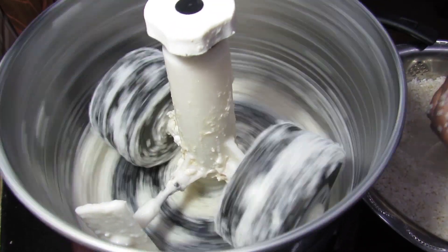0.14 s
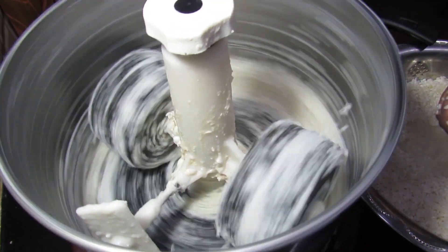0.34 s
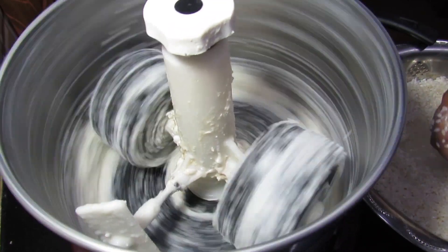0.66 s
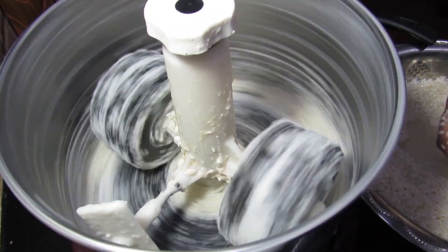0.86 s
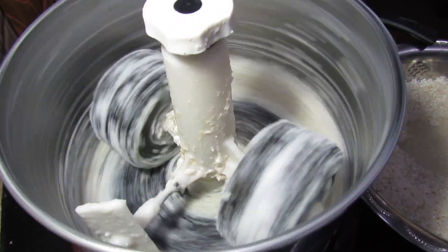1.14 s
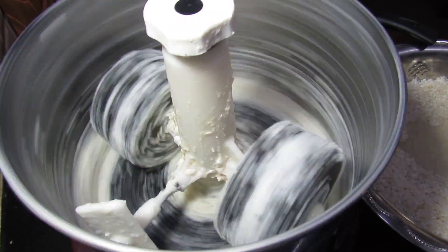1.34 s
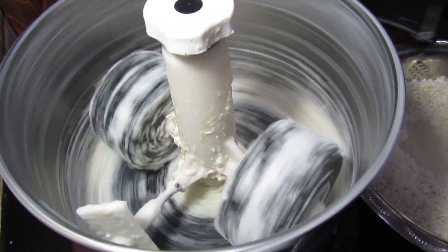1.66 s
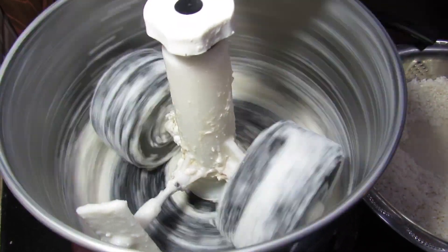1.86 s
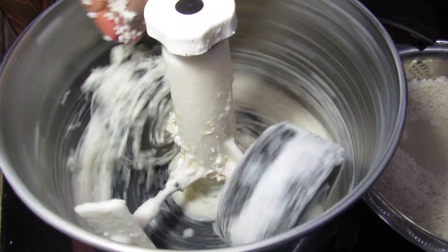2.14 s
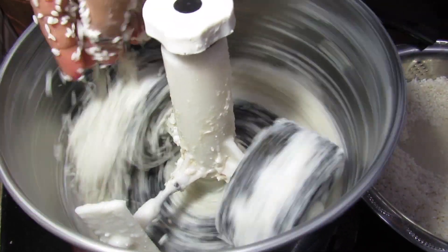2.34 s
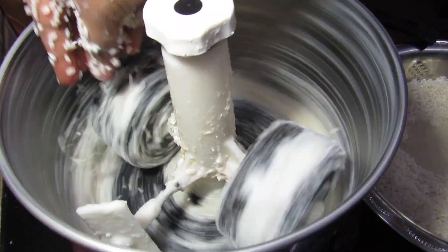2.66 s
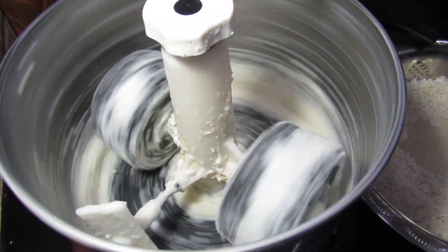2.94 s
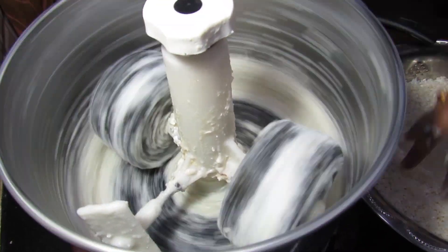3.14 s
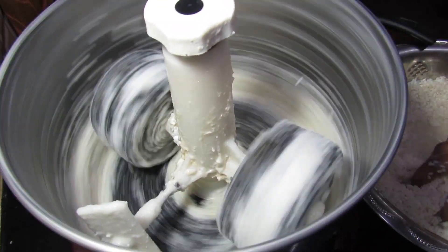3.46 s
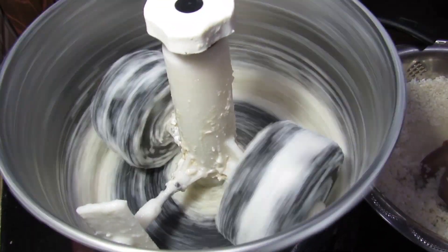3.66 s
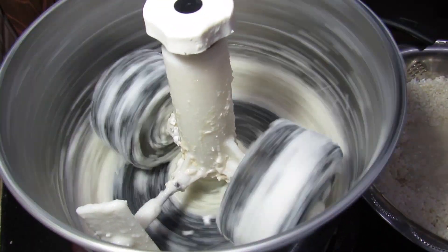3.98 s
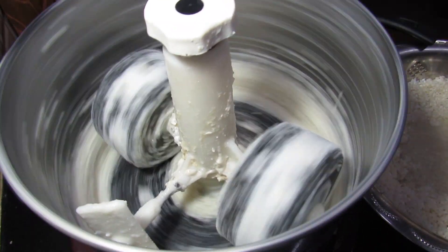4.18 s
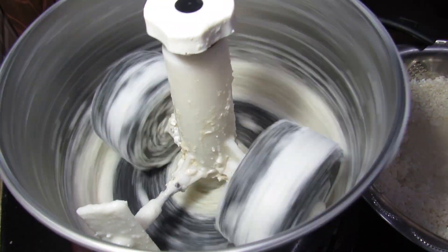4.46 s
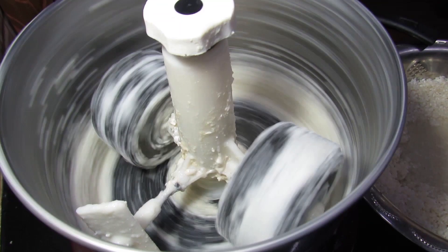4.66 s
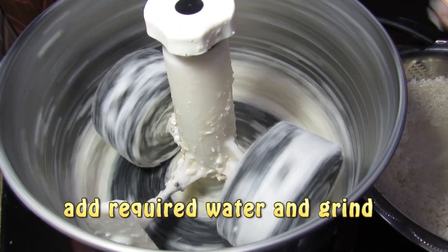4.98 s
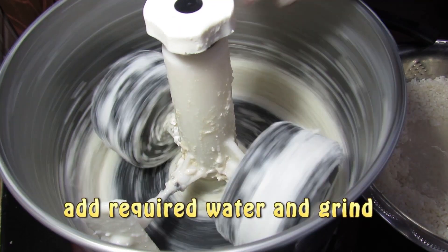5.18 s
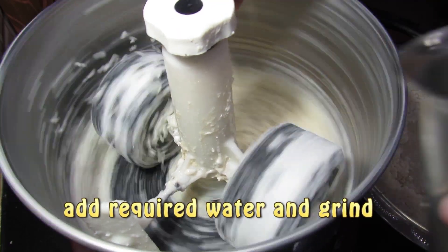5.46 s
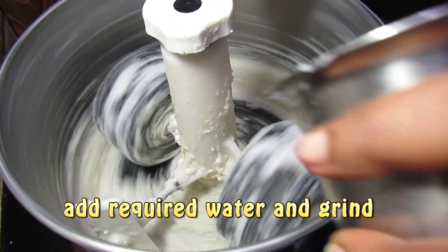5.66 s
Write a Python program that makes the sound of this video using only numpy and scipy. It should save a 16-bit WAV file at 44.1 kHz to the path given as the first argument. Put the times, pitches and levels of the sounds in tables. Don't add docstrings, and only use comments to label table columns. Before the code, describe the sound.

Close, steady motor hum with thudding stone rollers, snapping grains and wet hiss; rice showers in, and near the end a metal cup briefly squeaks.

```python
import sys
import numpy as np
from scipy import signal
from scipy.fft import rfft, irfft, next_fast_len
from scipy.io import wavfile
from scipy.ndimage import uniform_filter1d, map_coordinates

SR = 44100
rng = np.random.default_rng(int(sys.argv[2]) if len(sys.argv) > 2 else 0)


def int16_out(signal):
    q = np.round(np.clip(np.atleast_2d(signal).T, -1, 1) * 32767)
    wavfile.write(sys.argv[1], SR, q.astype(np.int16))


def attenuation_scalar(level_db):
    decades = np.asarray(level_db, float) / 20
    return 10 ** decades


N = 256750

# (f/Hz, width/Hz, level/dB)
STONE = [(571, 60, -1), (782.6, 24, 1), (878, 42, 5), (1000, 62, -2.5), (1138, 130, -5), (1380, 87, 0),
         (1574, 84, -6), (1734, 81, -2.5), (2107, 420, -8.5), (2800, 600, -18)]
TOUCH_S, DAMP_S = 5.55, 0.089
DAMPED_DB = -9.5


def unit(x):
    return x / np.sqrt(np.mean(x ** 2) + 1e-20)


def evened(x, share):
    power = np.abs(uniform_filter1d(x ** 2, size=SR // 14)) + 1e-12
    return unit(x / power ** (share / 2))


def along(points, hz):
    f, v = np.transpose(points)
    return np.interp(np.log(hz + 1), np.log(f + 1), v)


def curves(rows):
    s, *cols = np.transpose(rows)
    return [np.interp(np.arange(N) / SR, s, c) for c in cols]


def wobble(rate):
    knots = rng.standard_normal(int(N * rate / SR) + 4)
    return map_coordinates(knots, [np.arange(N) * rate / SR])


def settle(s, long_s):
    return (1 + np.tanh(2 * (np.arange(N) / SR - s) / long_s)) / 2


def drum_swing(count):
    turn_hz, high_spot_s = 2.5, 0.07
    return np.cos(2 * np.pi * count * turn_hz * (np.arange(N) / SR - high_spot_s))


def struck(t, rise_s, t60):
    return attenuation_scalar(-60 * t / t60) * (1 - np.exp(-t / rise_s))


def filtered(x, response):
    m = next_fast_len(N + SR // 2)
    return irfft(rfft(x, m) * response(np.fft.rfftfreq(m, 1 / SR)), m)[..., :N]


def modes(table):
    def response(f):
        return sum((-1) ** k * attenuation_scalar(db) * 1j * f * w / (c * c - f * f + 1j * f * w)
                   for k, (c, w, db) in enumerate(table))
    return response


def pasted(table, hz):
    return lambda f: modes(table)(f) / (1 + (f / hz) ** 6)


def bumps(rate, spread_db, smooth_db, life):
    size = attenuation_scalar(spread_db * np.minimum(rng.exponential(size=N), 2.5))
    hits = (rng.random(N) < rate / SR) * size
    pressure = signal.lfilter([1], [1, -np.exp(-1 / (life * SR))], hits)
    return unit(pressure * rng.standard_normal(N)) + attenuation_scalar(smooth_db) * rng.standard_normal(N)


def motor():
    # (multiple of the hum, level/dB)
    overtones = [(2, -5), (3, -5), (4, -1), (6, -21)]
    hum_db = -27.5 + DAMPED_DB * settle(TOUCH_S, DAMP_S)
    shifted = settle(3.55, .2)
    shaft_db = -37.5 - 12.5 * shifted
    stand_db = -41.5 + 4.5 * shifted
    turn = 2 * np.pi * np.cumsum(100.13 + .15 * wobble(4.013)) / SR
    hum = np.sin(turn) * attenuation_scalar(0.24 * wobble(6.6))
    for k, db in overtones:
        hum += attenuation_scalar(db + 2.1 * wobble(7.6)) * np.sin(k * turn + .5 * wobble(4.6))
    shaft = attenuation_scalar(shaft_db) * np.sin(.488 * turn)
    stand = filtered(rng.standard_normal(N), lambda f: modes([(69, 12, 0)])(f) ** 2)
    stand = attenuation_scalar(stand_db + 1.2 * drum_swing(count=1)) * unit(stand)
    return np.sqrt(2) * (attenuation_scalar(hum_db) * hum + shaft) + stand


def room_tone():
    # (f/Hz, level/dB per Hz)
    spectrum = [(15, -55), (25, -51), (82, -16), (136, -12.5), (200, -4.5), (262, -25.5), (403, -17.5),
                (667, -34.5), (876, -29), (2600, -49), (3380, -66), (5720, -120)]
    noise = filtered(rng.standard_normal(N), lambda f: attenuation_scalar(along(spectrum, f)))
    return attenuation_scalar(-28.0 + DAMPED_DB * settle(TOUCH_S, DAMP_S)) * unit(noise)


def rolling():
    # (f/Hz, width/Hz, level/dB)
    bottom = [(168.1, 13.6, -4.5), (199, 11.9, 1.5), (231, 10.2, -6.5)]
    # (f/Hz, width/Hz, level/dB)
    bowl = [(248.3, 30.5, -7), (316.6, 34.6, -2.5), (353, 36.8, -1), (391.6, 25.8, -1.5), (423.6, 23, -6),
            (475, 36.5, -11)]
    # (t/s, level/dB on the drum bottom)
    loads = [(.04, 2), (.29, -3), (.6, 2.5), (1.04, -10), (1.21, 4), (1.53, -2), (1.74, -9), (1.95, 2),
             (2.05, 3), (2.21, 11), (2.3, 2), (2.46, 10.5), (2.63, -10), (2.88, 8.5), (2.96, -5),
             (3.22, 1.5), (3.42, 1.5), (3.56, 5), (3.69, 1), (3.78, -6), (4.03, 8), (4.29, 8.5),
             (4.47, 8.5), (4.73, -18), (4.78, 7), (4.92, 5.5), (4.99, -6), (5.3, 5.5), (5.49, 5),
             (5.59, -6)]
    t = np.arange(N) / SR
    swell_s = 0.018
    load_db = sum(db * np.exp(-((t - s) / swell_s) ** 2 / 2) for s, db in loads)
    boom_db = -22.5 + 2 * drum_swing(count=1) + drum_swing(count=2) + load_db
    boom_db = boom_db - 2.5 * settle(TOUCH_S, DAMP_S)
    roll_db = -22 + 0.25 * drum_swing(count=1) + 0.42 * wobble(25)

    def deep(f):
        return (1j * f / 150) ** 2 / (1 + 1.1j * f / 150 - (f / 150) ** 2)

    tread = filtered(bumps(200, 0.38, 0.29, life=0.0016), lambda f: deep(f) ** 2)
    boom = attenuation_scalar(boom_db) * evened(filtered(tread, pasted(bottom, 246)), share=1.0)
    roll = attenuation_scalar(roll_db) * evened(filtered(tread, pasted(bowl, 533)), share=0.49)
    return boom + roll


def grinding():
    # (t/s, level/dB over thin batter)
    feed = [(0, 0.5), (1.2, 0.1), (1.9, 2.5), (2.3, 7), (2.6, 8), (3.05, 3.5), (3.4, 5), (3.65, 2),
            (4.3, 4), (5.2, 4), (5.82, 6)]
    # (f/Hz, level/dB per Hz)
    hiss_spectrum = [(1350, -30), (2300, -20), (3120, 0), (3970, -5.5), (4650, -3), (5690, -7),
                     (6410, -6.5), (6890, -8.5), (7830, -4.5), (8560, -6.5), (9190, -6.5), (11500, -7.5),
                     (14200, -11.5), (15600, -17)]
    # (f/Hz, width/Hz, level/dB)
    steel_wall = [(4990, 420, -5), (6500, 540, -5), (9450, 480, -3.5), (11000, 600, -2.5)]
    feed_db, = curves(feed)
    surge = wobble(18)
    grind_db = -36 + .4 * feed_db + 1.02 * surge
    hiss_db = -44.7 + feed_db + 0.97 * surge + 0.71 * wobble(35)
    crush = bumps(160, 0.97, 3.0, life=0.0024)
    grind = attenuation_scalar(grind_db) * unit(filtered(crush, pasted(STONE, 4200)))
    spray = attenuation_scalar(-13.5) * crush + bumps(400, 3.5, 4.4, life=0.00055)

    def colour(f):
        return attenuation_scalar(along(hiss_spectrum, f)) * (1 + np.abs(modes(steel_wall)(f)))

    return grind + attenuation_scalar(hiss_db) * unit(filtered(spray, colour))


def cracks():
    # (t/s, peak level/dB, edge level/dB)
    near_grains = [(0.027, -13, -16.5), (.148, -15.5, -14), (.432, -14.5, -17), (.596, -15, -18),
                   (1.155, -15, -32), (1.604, -14.5, -18), (1.696, -17, -21), (1.805, -16, -24),
                   (2.143, -12.5, -19), (2.224, -10, -17), (2.43, -13, -19), (2.773, -13, -25),
                   (2.854, -13, -22), (2.924, -11.5, -13), (3.424, -15.5, -24), (3.441, -12, -25),
                   (3.797, -18, -10), (3.826, -15, -21), (4.266, -17.5, -10), (4.449, -8, -15),
                   (4.871, -26, -22), (4.967, -13.5, -14.5), (5.034, -20, -19), (5.19, -14.5, -28),
                   (5.518, -16.5, -14), (5.792, -9, -26)]
    # (t/s, peak level/dB, edge level/dB)
    far_grains = [(.067, -15.5, -16), (.31, -20.5, -7.5), (.497, -16.5, -15), (.546, -12.5, -13),
                  (.632, -20, -15), (.752, -15, -17), (.831, -13, -13), (.892, -12.5, -18),
                  (0.951, -14.5, -10), (1.353, -9.5, -11.5), (1.437, -13, -25), (1.76, -10.5, -19),
                  (2.205, -14, -19), (2.292, -20, -20), (2.548, -11, -18), (3.357, -14.5, -14),
                  (3.375, -15.5, -11), (3.782, -11.5, -13), (4.185, -18.5, -13), (4.668, -22, -12),
                  (5.437, -19, -28), (5.564, -10, -24), (5.778, -12.5, -24), (.19, -29, -20),
                  (.35, -18.5, -15), (1.995, -19.5, -20), (3.29, -14.5, -13), (5.737, -17.5, -21)]
    near_hz, far_hz = 913, 1358
    ring, dull, edge = np.zeros((3, N + SR))
    t = np.arange(SR // 8) / SR
    soft = [(s * N / SR, -23.5 + 2.5 * size, -20)
            for s, size in zip(rng.random(size=90), rng.standard_normal(size=90))]
    grains = [(*row, near_hz) for row in near_grains + soft[::2]]
    grains += [(*row, far_hz) for row in far_grains + soft[1::2]]
    for s, db, edge_db, hz in grains:
        hz = hz * (1 + 0.023 * rng.standard_normal())
        burst = attenuation_scalar(db + 0.5) * struck(t, 0.00013, t60=0.067) * rng.standard_normal((2, len(t)))
        here = slice(round(s * SR), round(s * SR) + len(t))
        ring[here] += attenuation_scalar(db - 11.5 - 60 * t / 0.048) * np.sin(2 * np.pi * hz * t)
        dull[here] += burst[0]
        edge[here] += attenuation_scalar(edge_db) * burst[1]
    dull = filtered(dull[:N], lambda f: modes(STONE)(f) * (f / 1200) ** 0.23)
    edge = filtered(edge[:N], modes([(4200, 1300, 0)]))
    return ring[:N] + attenuation_scalar(4) * dull + attenuation_scalar(1.5) * edge


def thuds():
    # (t/s, peak level/dB, f/Hz)
    drops = [(0.102, -3, 199), (0.393, 3.5, 194), (0.469, -1, 194), (0.514, 2.5, 351), (0.831, 3.5, 310),
             (0.893, 9, 310), (1.209, -10, 193), (1.635, 0, 172), (1.771, 2, 192), (1.923, 6, 170),
             (2.772, 5.5, 198), (2.851, -9, 187), (3.08, 3, 220), (3.179, 3, 184), (3.222, 3, 194),
             (3.443, 1, 393), (3.518, 1, 208), (3.563, 5, 200), (3.979, 5, 245), (4.772, 4, 196),
             (5.191, 2, 222), (5.354, 4.5, 328)]
    out, t = np.zeros(N + SR), np.arange(SR // 10) / SR
    for s, db, hz in drops:
        thud = attenuation_scalar(db - 8.5) * struck(t, 0.0024, t60=0.069) * np.sin(2 * np.pi * hz * t)
        out[round(s * SR):][:len(t)] += thud
    return out[:N]


def ticks():
    # (t/s, peak level/dB, f/Hz)
    flung = [(.1468, -18.5, 6370), (.2284, -26, 5140), (.3082, -23, 6290), (.5087, -27, 5360),
             (.5457, -18, 4530), (.822, -23, 6230), (.949, -24, 4200), (1.1139, -28, 5720),
             (1.358, -18, 6440), (1.4361, -25, 4690), (1.6292, -23, 8300), (1.7547, -18, 4250),
             (2.0812, -22, 7570), (2.1894, -24, 5770), (2.2308, -25, 9450), (2.2583, -23, 5206),
             (2.3955, -19, 6440), (2.589, -14, 7720), (2.9745, -21, 5180), (3.29, -30, 5090),
             (3.4909, -26, 4790), (3.7815, -17, 4400), (4.1846, -20, 6400), (4.2652, -16, 6300),
             (4.346, -18.5, 4660), (4.586, -25, 9174), (4.6682, -23, 7550), (5.0719, -25, 6350),
             (5.2333, -22, 6563), (5.357, -21, 9140)]
    out, t = np.zeros(N + SR), np.arange(SR // 16) / SR
    stray_s = rng.random(30) * N / SR
    stray_db = -26 + rng.standard_normal(30)
    stray_hz = np.clip(6000 * np.exp(0.27 * rng.standard_normal(30)), 3000, 12000)
    for s, db, hz in [*flung, *zip(stray_s, stray_db, stray_hz)]:
        burst = attenuation_scalar(db - 8.0) * struck(t, 0.00081, t60=0.036) * rng.standard_normal(len(t))
        coloured = signal.lfilter(*signal.iirpeak(hz, 2.5, SR), burst)
        out[round(s * SR):][:len(t)] += burst + 1.83 * coloured
    return filtered(out[:N], lambda f: modes([(7500, 9000, 0)])(f) ** 2)


def showers():
    # (t/s, half length/s, level/dB, f/Hz)
    handfuls = [
        (2.03, .03, -40, 9500),
        (2.091, 0.031, -34.5, 6860),
        (2.27, 0.023, -47, 9000),
        (2.397, 0.032, -33, 5730),
        (5.318, 0.023, -38.5, 7400),
        (5.38, 0.014, -30.5, 3480),
        (5.35, 0.046, -39, 9000),
    ]
    out, t = np.zeros(N), np.arange(N) / SR
    grains = bumps(900, 8.2, -2.0, life=0.0027)
    for s, half, db, hz in handfuls:
        swell = np.exp(-((t - s) / half) ** 2 / 2)
        out += attenuation_scalar(db) * swell * unit(signal.lfilter(*signal.iirpeak(hz, 1.6, SR), grains))
    return filtered(out, modes([(6000, 12000, 0)]))


def cup():
    # (t/s, slip rate f/Hz, level/dB)
    squeak = [
        (5.558, 590, -26),
        (5.565, 575, -16),
        (5.576, 530, -16),
        (5.598, 527, -15.5),
        (5.62, 544, -18),
        (5.655, 553, -17),
        (5.684, 520, -19),
        (5.7, 505, -25),
        (5.725, 495, -36),
    ]
    # (f/Hz, width/Hz, level/dB)
    cup_body = [(560, 150, 4.5), (1050, 490, -3), (1580, 220, -2), (2150, 140, 2.5), (2780, 350, -12),
                (3290, 250, -12.5), (4400, 900, -15), (6300, 2000, -15.5), (9600, 4800, -21)]
    # (f/Hz, width/Hz, level/dB)
    cup_ring = [(2190, 14, -9), (3270, 9, -4)]
    hz, db = curves(squeak)
    start_s, end_s = squeak[0][0], squeak[-1][0]
    t = np.arange(N) / SR - start_s
    touch = np.clip(t / 0.0021, 0, 1) * (t < end_s - start_s)
    turn = 2 * np.pi * np.cumsum(hz * (1 + 0.01 * wobble(250))) / SR
    slips = np.zeros(N)
    for k in range(1, 28):
        slips += attenuation_scalar((1.7 + 0.2 * k) * wobble(70)) * np.cos(k * turn) / np.sqrt(14)
    scrape = (0.71 + 0.6 * np.exp(-np.abs(t - .007) / 0.003)) * rng.standard_normal(N)
    rub = touch * attenuation_scalar(db + 5.0) * (slips + scrape)
    knock = (t > 0) * attenuation_scalar(-6.5) * struck(np.abs(t), .003, t60=0.069) * np.sin(2 * np.pi * 585 * t)
    return knock + filtered(rub, lambda f: modes(cup_body)(f) + modes(cup_ring)(f))


def kitchen(near):
    t60, level_db = .083, -16
    t = np.arange(SR // 3) / SR
    tail = rng.standard_normal(len(t)) * attenuation_scalar(-60 * t / t60)
    return near + attenuation_scalar(level_db) * signal.fftconvolve(near, tail / np.linalg.norm(tail))[:N]


def two_ports(near):
    # (f/Hz, left-right likeness)
    alike = [(40, .995), (100, .998), (300, .998), (800, .96), (2300, .965), (4000, .97), (6500, .87),
             (10700, .79), (14000, .5)]
    # (f/Hz, left over right level/dB)
    left_over_right = [(40, .3), (100, 2.5), (400, 3.8), (860, 3.2), (1200, 2.5), (2200, 2.8), (2800, 1),
                       (7000, .6), (14000, 1.7)]
    # (f/Hz, left lead/rad)
    left_lead = [(40, -.2), (90, -.5), (500, -.14), (1300, -.17), (1900, .06), (4000, .08), (8600, .62),
                 (14500, 1.2)]
    z = signal.stft(near, nperseg=512)[2]
    scrambled = z * np.exp(2j * np.pi * rng.random(z.shape))
    diffuse = 1.98 * signal.istft(scrambled, nperseg=512)[1][:N]
    side = filtered(diffuse, lambda f: np.tan(np.arccos(np.clip(along(alike, f), -1, 1)) / 2))

    def ports(f):
        gain = attenuation_scalar(np.outer([.5, -.5], along(left_over_right, f)))
        return gain * np.exp(1j * np.outer([.5, -.5], along(left_lead, f)))

    return filtered(np.array([near + side, near - side]), ports)


def scene():
    machine = motor() + room_tone() + rolling() + grinding()
    rice = cracks() + thuds() + ticks() + showers()
    return two_ports(kitchen(machine + rice + cup()))


def gain_control():
    # (t/s, level/dB)
    ducks = [
        (0.906, -5),
        (2.5, -2.5),
    ]
    grab_s, recover_s = .01, 0.55
    t = np.arange(N) / SR
    return attenuation_scalar(sum(db * settle(s, grab_s) * np.exp(-np.abs(t - s) / recover_s) for s, db in ducks))


def band_limit(x):
    return signal.sosfilt(signal.butter(12, 15750, fs=SR, output="sos"), x)


def record(dry):
    x = dry * gain_control()
    x = x / (1 + np.abs(x / .99) ** 6) ** (1 / 6)
    x = filtered(x, lambda f: f < 15760)
    return band_limit(x)


dry = scene()
out = record(dry)
int16_out(out)
```